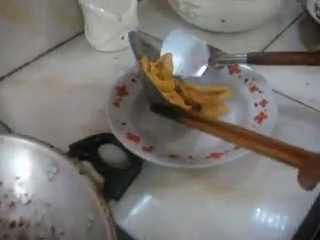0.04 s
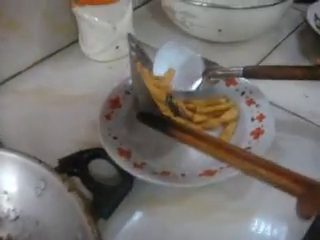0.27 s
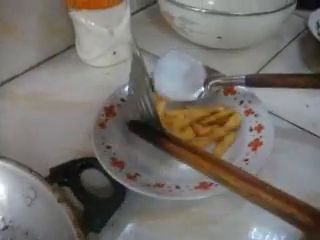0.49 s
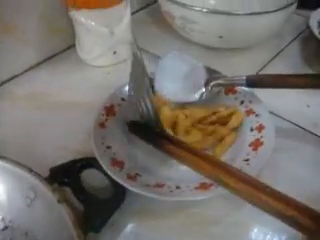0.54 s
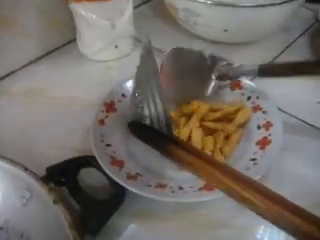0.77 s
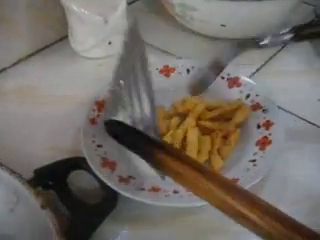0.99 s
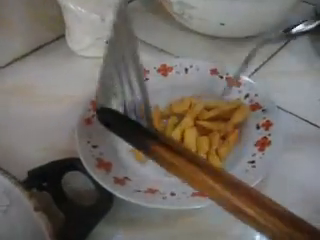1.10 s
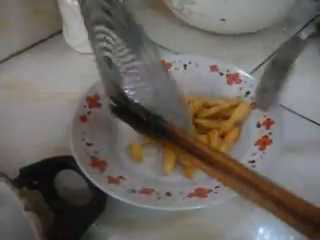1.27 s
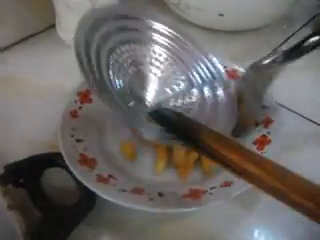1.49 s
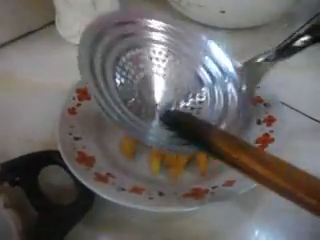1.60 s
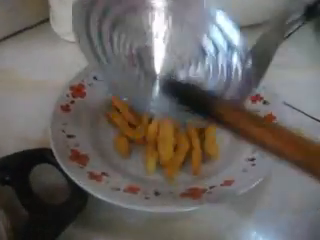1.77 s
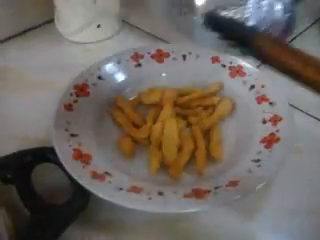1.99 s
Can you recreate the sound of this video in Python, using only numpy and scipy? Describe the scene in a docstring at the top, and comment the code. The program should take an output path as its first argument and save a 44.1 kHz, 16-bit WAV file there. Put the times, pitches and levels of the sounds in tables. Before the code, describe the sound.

Metal utensils clink and scrape as crisp fried sticks rustle onto a plate, in two ringing flurries from 0.1 to 0.4 and 0.5 to 0.9 seconds. A few faint ticks follow. At about 1.5 seconds the microphone thumps and steel drags over a skimmer, ringing and squeaking briefly. Two light clinks come near 1.8 and 2 seconds. A steady hiss runs throughout in the small kitchen.

```python
"""In a small, hissing kitchen, a metal spoon pushes crisp fried sticks off a perforated skimmer onto a plate.
The crusts rustle as a dense train of tiny impulses; their fall and the utensils excite damped modes,
heard as clinks, and rubbing sustains the main ring. Then steel drags over the skimmer, which rings
under friction and squeaks by stick-slip. A few jolts thump the microphone."""
import sys
import numpy as np
from scipy import signal
from scipy.fft import rfft, irfft
from scipy.io import wavfile

SR = 44100
rng = np.random.default_rng(int(sys.argv[2]) if len(sys.argv) > 2 else 0)


def digitize_waveform(pressure):
    """Quantize a signal to 16-bit integers and store it at the path in sys.argv[1].

    Rows of a 2-D input are taken as channels; values are limited to [-1, 1].
    """
    field = np.atleast_2d(pressure).T
    bounded = np.clip(field, -1, 1)
    quanta = np.round(bounded * 32767).astype(np.int16)
    wavfile.write(sys.argv[1], SR, quanta)


N = 90404
T = np.arange(N) / SR


def amp(db):
    """Amplitude ratio of a level in decibels."""
    return 10 ** (np.asarray(db) / 20)


def unit(x):
    """Normalisation to rms 1."""
    return x / np.sqrt(np.mean(x ** 2) + 1e-20)


def level(points):
    """Envelope through (time [s], level [dB]) points, silent from 30 ms beyond either end."""
    s, db = np.transpose(points)
    return amp(np.interp(T, s, db)) * (T >= s[0] - .03) * (T <= s[-1] + .03)


def colour(x, points):
    """Minimum-phase filter of unit power, shaped by (frequency [Hz], level [dB]) points."""
    hz, db = np.transpose(points)
    f = abs(np.fft.fftfreq(4096, 1 / SR))
    log_gain = np.log(amp(np.interp(np.log(f + 1), np.log(hz), db)))
    response = np.exp(np.conj(signal.hilbert(log_gain)))
    taps = np.fft.ifft(response).real[:2048]
    return signal.fftconvolve(x, taps / np.linalg.norm(taps))[:N]


def wander(hz):
    """Random modulation: low-pass Gaussian noise of rms 1."""
    f = np.fft.rfftfreq(N, 1 / SR)
    return unit(irfft(rfft(rng.standard_normal(N)) * np.exp(-(f / hz) ** 2), N))


def tone(hz):
    """Sinusoid whose phase is the integral of its instantaneous frequency."""
    return np.sin(2 * np.pi * np.cumsum(hz) / SR)


def grains(per_s, spread_db):
    """Shot noise: randomly timed impulses of uneven size, rms 1."""
    size = amp(spread_db * np.minimum(rng.exponential(1, N), 4))
    return unit(size * rng.choice([-1, 1], N) * (rng.random(N) < per_s / SR))


def add(mix, s, sound):
    """Superposition of a sound on the mix, starting at s seconds."""
    part = mix[max(round(s * SR), 0):][:len(sound)]
    part += sound[:len(part)]


# Spectrum of the kitchen's hiss: (frequency [Hz], relative level [dB])
HISS_SPECTRUM = [(25, -23), (60, -13.5), (120, -8.5), (330, -7.5), (550, -4.5), (800, -4.5), (1400, -9.5),
                 (1800, 0), (2300, -1.5), (3000, -1), (4200, -2.5), (6000, -5), (7500, -4), (8600, -8.5),
                 (9800, -18)]
# Partials of the hum: (frequency [Hz], rms level [dB])
HUM_PARTIALS = [(300, -54), (399, -52), (765, -50)]

def hiss(swell_db=-0.4):
    """Broadband noise and fine shot noise form a steady hiss over faint, wavering hum partials."""
    noise = amp(-31.5) * rng.standard_normal(N) + amp(-46.5) * grains(500, spread_db=7)
    hum = sum(amp(db) * np.sqrt(2) * tone(hz + 4 * wander(hz=16.7)) for hz, db in HUM_PARTIALS)
    return colour(noise, HISS_SPECTRUM) * amp(swell_db * wander(hz=11)) + hum


# Envelope of the rumble: (time [s], level [dB])
RUMBLE_ENVELOPE = [(0, -65.5), (.82, -55.5), (1.47, -52.5), (2.05, -66)]
# Its spectrum: (frequency [Hz], relative level [dB])
RUMBLE_SPECTRUM = [(30, -16.5), (85, -12.5), (122, 2.5), (170, -22), (2000, -71)]

def rumble():
    """Amplitude-modulated low-frequency noise: a faint rumble comes and goes."""
    return level(RUMBLE_ENVELOPE) * colour(rng.standard_normal(N), RUMBLE_SPECTRUM)


# Envelopes of the pieces tumbling and of their crusts scraping on metal: (time [s], level [dB])
TUMBLE_ENVELOPE = [(0, -57), (.07, -54), (.11, -28.5), (.17, -32.5), (.22, -28.5), (.27, -29.5),
                   (.33, -33.5), (.39, -40), (.49, -45), (.535, -29.5), (.59, -25), (.65, -25),
                   (.745, -26.5), (.78, -31), (.84, -48), (.89, -27), (.96, -42), (1.08, -42),
                   (1.125, -31.5), (1.17, -35), (1.5, -39), (1.72, -32), (2.05, -35.5)]
SCRAPE_ENVELOPE = [(.225, -53), (.247, -33), (.285, -31), (.316, -41.5), (.33, -22.5), (.347, -52),
                   (.515, -52), (.53, -25), (.55, -32.5), (.6, -27), (.75, -35)]
# Their spectra: (frequency [Hz], relative level [dB])
TUMBLE_SPECTRUM = [(100, -37.5), (400, -12.5), (620, 1.5), (790, 3.5), (1110, 4.5), (1450, -2), (2000, -1),
                   (2450, 2.5), (3000, 1), (5200, -7), (6200, -15), (7500, -10), (9800, -28.5)]
SCRAPE_SPECTRUM = [(1500, -29), (3600, 3), (5300, 3.5), (6300, -8), (7400, -0.5), (9800, -22.5)]

def rustle():
    """Micro-impacts of crisp crusts merge into shot noise, brighter where they slide on metal."""
    tumble = colour(level(TUMBLE_ENVELOPE) * grains(2800, spread_db=4), TUMBLE_SPECTRUM)
    scrape = colour(level(SCRAPE_ENVELOPE) * grains(3500, spread_db=2.6), SCRAPE_SPECTRUM)
    return tumble + scrape


# Impacts at the plate:
# (time [s], main-mode drive [dB], upper-mode drive [dB], relative crack level [dB], contact time [s])
IMPACTS = [(0.0919, -31, -21, -22.5, 0.0013), (0.128, -16, -30, -40, 0.0022), (0.1473, -27, -18, -36, .003),
           (0.2078, -18.5, -19, -21.5, 0.003), (.243, -14.5, -12, -18.5, 0.0038),
           (.2574, -11, -27, -23.5, 0.0016), (.278, -8.5, -15, -15, 0.0032),
           (0.304, -18, -16, -25, 0.00079), (0.3252, -24, -15, -23, 0.00071), (.366, -20, -32, -32, 0.0023),
           (.527, -19, -17, -17, 0.0014), (.565, -20, -19, -24, 0.0018), (0.5989, -4.5, -2.5, -13, 0.001),
           (.625, -15, -24.5, -19, 0.00045), (.6322, -0.5, -21, -17, 0.0005),
           (0.6383, -2.5, -25, -17, 0.001), (0.6564, -9.5, -16, -14, 0.00067),
           (.679, -7.5, -15, -16.5, 0.0018), (0.696, -21, -23, -20, 0.0012),
           (0.7196, -8.5, -11, -17, 0.0005), (0.7323, -18, -17, -21, .0015),
           (0.745, -14.5, -27, -19, 0.0011), (0.7957, -9.5, -8.5, -18.5, 0.00047),
           (.8425, -15, -15, -21.5, 0.0017), (0.8622, -15.5, -8.5, -21.5, 0.00075),
           (.870, -16, -17, -28, 0.001), (0.889, -26, -25, -36, .002), (1.033, -42, -17, -26.5, 0.0012),
           (1.121, -29, -26, -23, 0.0039), (1.2067, -36, -29, -20.5, 0.00026),
           (1.214, -23.5, -13.5, -33, 0.00061), (1.8327, -16, -23, -26, 0.00054),
           (1.955, -20.5, -21, -20, 0.0009)]
# Modes they excite: (frequency [Hz], relative level [dB], decay time T60 [s])
IMPACT_MODES = [(778, -28.5, 0.13), (1117, -24.5, 0.15), (1770, -20.5, 0.067), (2180, -20, 0.11),
                (2363, -15, 0.11), (2448, 2, 0.035), (2467, -9.5, 0.15), (2700, -19.5, .13),
                (3192, -17.5, 0.062), (4164, -9.5, 0.043), (4860, -21.5, 0.12), (7200, -29.5, 0.11)]
# Spectrum of the contact noise: (frequency [Hz], relative level [dB])
CRACK_SPECTRUM = [(100, -37), (400, -11), (800, -0.5), (1700, -2.5), (2800, -1), (4500, -6), (6000, -10),
                  (7500, -11.5), (9800, -29.5)]

def clinks(upper_from_hz=3500, crack_decay_s=0.0057):
    """Impact excitation: each contact gives a noisy crack and drives modes that build, then decay."""
    rings, crack_envelope = np.zeros(N), np.zeros(N)
    t = T[:SR // 2]
    draws = rng.uniform(-0.85, 1, (len(IMPACTS), len(IMPACT_MODES) + 1))
    for (s, main_db, upper_db, crack_db, contact), (detune, *spots) in zip(IMPACTS, draws):
        push = np.hanning(int(abs(contact) * 2 * SR) + 3)
        for (hz, db, t60), spot in zip(IMPACT_MODES, spots):
            drive_db = upper_db if hz > upper_from_hz else main_db
            mode_db = db * (1 + .25 * spot)  # weak modes vary most in level
            pitch = hz + 0.92 * detune / t60  # damped modes vary most in pitch
            decay = amp(drive_db + mode_db - 60 * t / t60)
            envelope = signal.fftconvolve(decay, push / push.sum())[:len(t)]
            add(rings, s, envelope * np.sin(2 * np.pi * pitch * t))
        attack = np.minimum(2 * t / abs(contact), 1)
        add(crack_envelope, s, amp(crack_db) * attack * np.exp(-t / crack_decay_s))
    cracks = colour(crack_envelope * rng.standard_normal(N), CRACK_SPECTRUM)
    return rings + amp(1) * cracks


# Envelope of the rubbed mode: (time [s], level [dB])
RUB_ENVELOPE = [(.122, -39), (.135, -24), (.16, -21.5), (.175, -42), (.276, -28), (.284, -7.5), (.291, -8),
                (.3, -21.5), (.37, -25.5), (.39, -45), (.5, -36.5), (.63, -21), (.645, -5.5), (.664, -17),
                (.735, -20), (.78, -50), (.815, -30), (.895, -27.5), (.95, -51), (1.75, -54), (1.84, -31),
                (2.05, -40.5)]

def rub(mode_hz=2466, waver_hz=14):
    """Frictional excitation: sliding contact bows the main ring into an unsteady tone."""
    pitch = mode_hz + waver_hz * wander(hz=146)
    flutter = 1 + 0.35 * wander(hz=110)
    return level(RUB_ENVELOPE) * flutter * tone(pitch)


# Squeaks of the utensils: (time [s], duration [s], frequency [Hz], peak level [dB])
SQUEAK_TONES = [(0.255, 0.021, 780, -24.5), (0.264, 0.034, 5200, -22.5), (0.543, 0.025, 1835, -21),
                (1.629, 0.047, 2350, -27), (1.653, 0.027, 2995, -21.5), (1.653, 0.03, 4780, -20.5),
                (1.675, 0.01, 5090, -17), (1.686, 0.0082, 5140, -17), (1.696, 0.0031, 5080, -13.5),
                (1.68, 0.054, 2988, -29), (1.625, 0.076, 8270, -34), (1.639, 0.078, 1345, -33)]

def squeaks(jitter=.021):
    """Stick-slip oscillation: steel edges catch and release in short, rough tones."""
    out = np.zeros(N)
    for s, length, hz, db in SQUEAK_TONES:
        n = int(length * SR)
        pitch = hz * (1 + jitter * wander(hz=900)[:n])
        arch = np.sin(np.pi * np.arange(n) / n)
        add(out, s, amp(db) * arch * tone(pitch))
    return out


# Pushes on the microphone: (time [s], duration [s], level before filtering [dB])
PRESSURE_PULSES = [(0.635, 0.0019, -25), (0.639, 0.0031, -32), (1.2088, 0.0011, -17),
                   (1.5418, .0195, -14.5), (1.564, 0.013, -17)]

def jolts(leak_hz=5.3, top_hz=605):
    """Low-passed pressure pulses thump the microphone; leakage acts as a first-order high-pass."""
    pressure = np.zeros(N)
    for s, length, db in PRESSURE_PULSES:
        add(pressure, s, amp(db) * np.ones(int(length * SR)))
    leaked = signal.lfilter(*signal.butter(1, leak_hz, "high", fs=SR), pressure)
    return signal.lfilter(*signal.butter(2, top_hz, fs=SR), leaked)


# Friction force of steel dragging over the skimmer: (time [s], level [dB])
DRAG_ENVELOPE = [(1.541, -55), (1.5435, -15.5), (1.556, -19.5), (1.581, -20.5), (1.596, -30), (1.63, -28.5),
                 (1.665, -28), (1.70, -27), (1.74, -59)]
# Spectrum of its rasp: (frequency [Hz], relative level [dB])
DRAG_SPECTRUM = [(100, -32), (500, -5), (1000, -2), (4600, 0.5), (6200, -0.5), (7700, -7), (8400, -4),
                 (9800, -21.5)]
# Modes of the skimmer: (frequency [Hz], level [dB], delay after the strike [s], rise time [s],
# driven time [s], decay time T60 [s], rms frequency deviation [Hz])
SKIMMER_MODES = [(1346, -15.5, .001, 0.027, 0.054, 0.19, 4), (2162, -16, 0.013, 0.0036, 0.032, 0.22, 6),
                 (2990, -21.5, .001, .003, 0.032, 0.06, 20), (3800, -26.5, 0.011, 0.017, 0.072, 0.15, 5.6),
                 (4450, -23, .001, .003, 0.019, .1, 141), (5520, -21.5, 0.011, 0.017, 0.025, 0.23, 110),
                 (6130, -26, .001, 0.0032, 0.023, 0.053, 110), (7050, -23, .001, .003, 0.035, 0.03, 81),
                 (8350, -27.5, .001, .005, 0.033, 0.05, 91)]

def skimmer(strike_s=1.542):
    """Forced vibration, then free decay: rasping steel drives the skimmer's modes, which ring out."""
    out = colour(level(DRAG_ENVELOPE) * grains(9000, spread_db=2), DRAG_SPECTRUM)
    for hz, db, delay, rise, driven, t60, waver_hz in SKIMMER_MODES:
        t = T - strike_s - abs(delay)
        envelope = np.clip(t / rise, 0, 1) * amp(db - 60 * np.maximum(t - driven, 0) / t60)
        pitch = hz + waver_hz * wander(hz=254)
        flutter = 1 + 0.3 * wander(hz=90)
        out += envelope * flutter * tone(pitch)
    return out


def room(x, first_s=.004, echoes_per_s=3000, split_hz=3500, low_t60_s=0.26, high_t60_s=0.17):
    """Reverberation: dense reflections from tiled walls decay exponentially, the treble sooner."""
    t = T[:SR // 2]
    echoes = rng.choice([-1, 1], len(t)) * (rng.random(len(t)) < echoes_per_s / SR) * (t > first_s)
    low = signal.sosfiltfilt(signal.butter(2, split_hz, fs=SR, output="sos"), echoes)
    tail = low * amp(-60 * t / low_t60_s) + (echoes - low) * amp(-60 * t / high_t60_s)
    return signal.fftconvolve(x, tail / np.linalg.norm(tail))[:N]


def scene():
    """Superposition of direct sound from plate and utensils, its reflections, background and jolts."""
    hits = clinks() + rub()
    scrapes = rustle() + skimmer() + squeaks()
    reflections = room(amp(-13.5) * hits + amp(-12.5) * scrapes)
    return (hits + scrapes + reflections + hiss() + rumble() + jolts())[None]


def record(dry, knee=5, cutoff_hz=9950):
    """Soft saturation rounds the loudest peaks; a low-pass filter then limits the bandwidth."""
    saturated = dry / (1 + abs(dry) ** knee) ** (1 / knee)
    lowpass = signal.firwin(511, cutoff_hz, window=("kaiser", 9), fs=SR)
    return signal.oaconvolve(saturated, lowpass[None], "same")


dry = scene()
out = record(dry)
digitize_waveform(out)
```